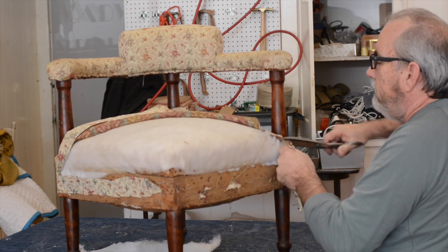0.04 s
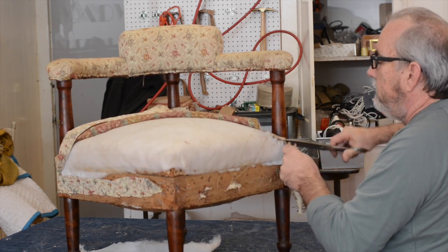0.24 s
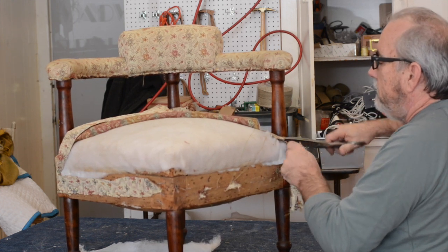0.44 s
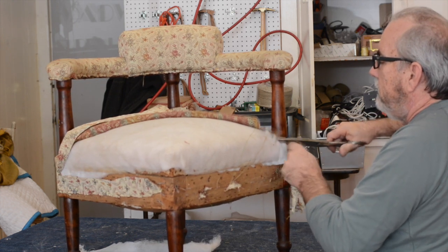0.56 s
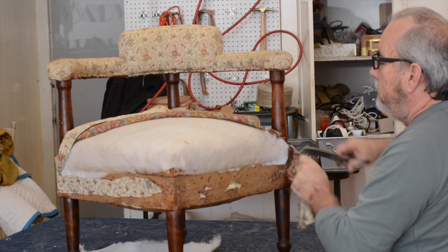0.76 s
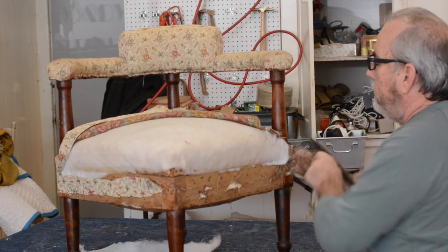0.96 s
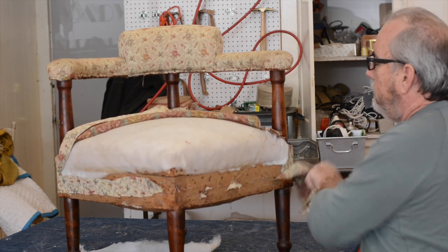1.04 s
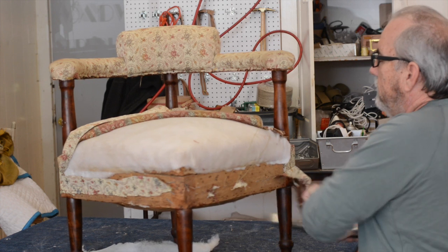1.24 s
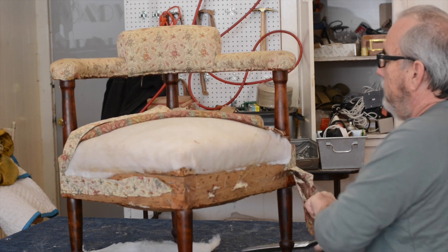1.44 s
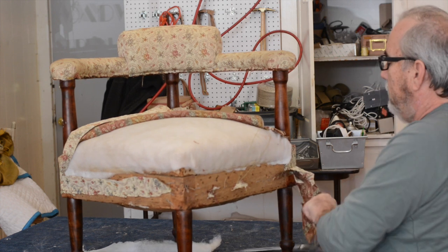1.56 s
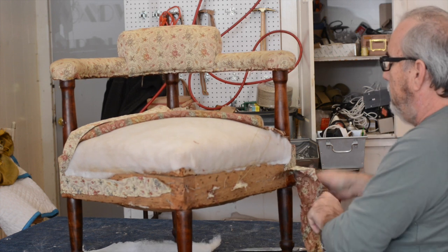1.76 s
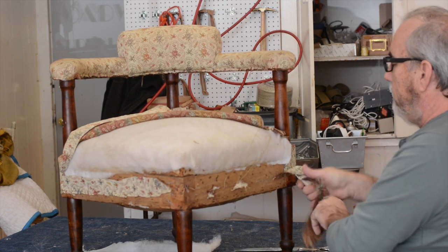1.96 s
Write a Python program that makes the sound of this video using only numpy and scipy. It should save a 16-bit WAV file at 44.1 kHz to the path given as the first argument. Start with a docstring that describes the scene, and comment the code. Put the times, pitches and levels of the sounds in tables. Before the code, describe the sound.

A flat steel tool scrapes lightly at a wooden chair frame and prises out two staples, each with a bright snap, the second louder. The steel then clicks and squeaks briefly among a few wooden knocks. Finally the tool is put down on the bench, where it thumps, judders and slides. The microphone stands far enough away to catch the short ring of a small, hard-walled workshop.

```python
"""A small, hard-walled workshop; one microphone, far enough off to hear the room ring after each sound.
First a flat steel tool scrapes at a wooden chair frame and prises out two staples, each letting go
with a bright snap. From about one second the steel squeaks and clicks, and the blade sings briefly.
Last, the tool is put down on the bench, where it thumps, judders and slides."""
import sys
import numpy as np
from scipy import signal
from scipy.fft import rfft, irfft
from scipy.io import wavfile
from scipy.ndimage import uniform_filter1d

SR = 44100
rng = np.random.default_rng(int(sys.argv[2]) if len(sys.argv) > 2 else 0)


def master(y):
    """Save y as 16-bit WAV."""
    cut = np.clip(np.atleast_2d(y).T, -1, 1)
    pcm = np.round(cut * 32767)  # scale
    wavfile.write(sys.argv[1], SR, pcm.astype(np.int16))


N = 88200
TIME = np.arange(N) / SR

# Staples letting go. Each row: start in seconds, level in dB, decay of the slips in seconds,
# treble tilt in dB per octave, resonance in Hz, its lift in dB.
STAPLE_SNAPS = [(0.1650, -13.5, 0.0018, 0.5, 11100, 3.5), (0.6326, -6.5, 0.00054, 0.05, 6100, 1)]
# Tone of a snap. Each row: frequency in Hz, gain in dB.
SNAP_SPECTRUM = [(150, -11), (600, -21.5), (1200, -20.5), (2000, -15), (2500, -10), (4200, -7), (4900, -3),
                 (8000, -4), (12000, 0.5), (16000, -9.5)]
# Light steel contacts. Each row reads as for the staples.
STEEL_TICKS = [(0.0765, -31, 0.025, -5.5, 940, 9), (0.6268, -33.5, 0.00015, -8.5, 2300, 14),
               (1.0333, -24.5, 0.00021, -4, 13000, 8.5), (1.0362, -33, 0.00025, -4, 7460, -11),
               (1.2188, -29, 0.00091, -6, 9000, 15), (1.226, -23, 0.018, -5.5, 1210, 7.5),
               (1.254, -36.5, 0.0025, -0.5, 9300, 6), (1.5002, -25, 0.0034, -1, 4460, 7),
               (1.5195, -24.5, 0.00072, -3, 9230, 19.5), (1.670, -21, 0.0054, -7, 1110, 15.5),
               (1.679, -32, 0.005, -0.5, 9000, 6)]
# Tone of a tick. Each row: frequency in Hz, gain in dB.
TICK_SPECTRUM = [(300, -1.5), (1200, -8), (2500, -1.5), (4500, -2), (6000, -4.5), (9000, -3), (11000, -7),
                 (16000, -9.5)]
# Single blows on wood. Each row: start in seconds, level in dB, pitch of the push in Hz.
WOOD_KNOCKS = [(0.0748, -32.5, 690), (0.492, -32, 387), (0.6277, -27.5, 313), (1.0333, -20.5, 390),
               (1.5445, -17.5, 590), (1.636, -30, 553)]
# The tool rebounding on wood. Each row: start, length and first gap in seconds, level in dB,
# fade in dB per second, pitch of the push in Hz at the start and at the end.
TOOL_JUDDERS = [(0.1, 0.018, 0.018, -31.5, 10, 710, 400), (1.229, 0.072, 0.0135, -20.5, 116, 180, 395),
                (1.516, 0.043, 0.0098, -11, 148, 180, 395), (1.671, 0.31, 0.015, -14, 71.5, 500, 553)]
# Ringing of the wood. Each row: frequency in Hz, relative level in dB, seconds to fall by 60 dB.
WOOD_MODES = [(144.6, 1, 0.13), (162, -14, 0.043), (272.5, -8, 0.16), (311, 3.5, 0.036), (366, -2, 0.12),
              (450, -5.5, 0.054), (506, 5.5, 0.031), (557, 4.5, 0.08), (618, -3, 0.19), (702.7, -2, 0.098),
              (807, -11, 0.14), (880, -26, 0.076), (1220, -15, 0.083)]
# Short squeaks of steel and wood, and the blade singing briefly after a click. Each row: start and
# length in seconds, first and last pitch in Hz, level in dB, second harmonic in dB against the first.
SHORT_TONES = [(0.103, 0.04, 8470, 8040, -39.5, -40), (0.123, 0.034, 562, 516, -28, -27),
               (1.0176, 0.022, 4300, 4680, -33.5, -9.5), (1.049, 0.055, 4700, 4757, -33, -18),
               (1.05, 0.05, 4280, 4220, -40, -27), (1.218, 0.0091, 1946, 1750, -27, -9),
               (1.243, 0.0085, 8730, 8370, -30, -40), (1.256, 0.084, 8250, 8700, -45, -46),
               (1.255, 0.035, 3500, 3350, -36, -35), (1.505, 0.0133, 1200, 930, -32, -43),
               (1.577, 0.072, 313, 257.5, -23, -7), (1.67, 0.031, 642, 543, -18.5, -37),
               (1.70, 0.055, 570.5, 466, -20.5, -20)]
# The blade dragging on wood and cloth. Each row: start and length in seconds, level in dB,
# treble tilt in dB per octave.
BLADE_SCRAPES = [(0.0, 0.029, -43, -2), (0.103, 0.048, -31, 0.5), (0.421, 0.031, -45.5, 1.5),
                 (0.614, 0.036, -38, 3), (1.683, 0.04, -41, 7), (1.705, 0.051, -30, 2.5),
                 (1.783, 0.081, -41, -2)]
# Tone of a scrape. Each row: frequency in Hz, gain in dB.
SCRAPE_SPECTRUM = [(80, -8.5), (300, 8.5), (900, -0.5), (1500, -3), (2500, -3), (4200, 1), (6000, -1),
                   (8600, -1), (10500, -8.5), (16000, -18.5)]
# Resonances of the blade. Each row: frequency in Hz, width in Hz, gain in dB.
BLADE_MODES = [(3030, 70, 5.5), (4060, 500, -6), (5300, 59, -33), (8250, 630, -9.5), (11900, 200, -4)]
# Weight coming onto the bench. Each row: start in seconds, level of the swell in dB.
BENCH_LOADS = [(0.13, -46), (1.214, -27), (1.52, -43), (1.74, -30)]
# Rumble of the bench. Each row: frequency in Hz, gain in dB.
SWAY_SPECTRUM = [(15, -37), (30, 3), (44, 8), (56, -11.5), (110, -20.5), (300, -50), (1000, -100)]
# The workshop's ring. Each row: frequency in Hz, seconds to fall by 60 dB,
# level in dB against the sound sent into the room.
ROOM_BANDS = [(100, 0.67, 1), (324, 0.46, 3.5), (670, 0.38, 6), (1340, 0.54, 2), (3150, 0.65, 3),
              (6000, 0.47, 6), (9160, 0.47, 0.5), (13200, 0.21, -9.5), (16000, 0.31, -4.5)]
# Room tone at the microphone. Each row: frequency in Hz, relative spectral density in dB.
HUSH_SPECTRUM = [(30, -19), (60, 3), (90, 0.5), (146, 2), (250, -10), (520, 0), (800, -8), (1300, -16.5),
                 (2200, -15), (5000, -19), (16000, -19.5)]


def steel_cracks(events, spectrum, evenness=0.74, ring_q=6):
    """Steel gives way in a brief burst of tiny slips, and one damped resonance stands out."""
    out, t = np.zeros(N), TIME[:SR // 10]
    for start, db, decay, tilt_db, ring_hz, ring_db in events:
        slips = rfft(rng.standard_normal(len(t)) * np.sqrt(t) * np.exp(-1.5 * t / decay))
        # so abrupt a break excites all frequencies nearly alike
        burst = irfft(slips / (np.abs(slips) + 1e-9) ** evenness)[:len(t) // 2]
        ring = signal.lfilter(*signal.iirpeak(ring_hz, ring_q, SR), burst)
        crack = colour(burst + (amp(ring_db) - 1) * ring, spectrum, tilt_db)
        add(out, start, hit_level(crack, db))
    return out


def wood_thumps(blows, thud_db=-4, push_cycles=0.46, band_hz=(130, 1200)):
    """Each blow pushes and rebounds; the wood answers with a dead thud and its ringing modes."""
    out, t = np.zeros(N), TIME[:SR // 2]
    ring = sum(amp(db) * np.cos(2 * np.pi * hz * t) * np.exp(-np.log(1000) * t / t60)
               for hz, db, t60 in WOOD_MODES)
    # boards radiate little deep bass, and the soft contact takes off the treble
    radiation = signal.butter(2, band_hz, "band", fs=SR, output="sos")
    for start, db, hz in blows:
        push = np.sin(2 * np.pi * hz * t) * np.exp(-t * hz / push_cycles)
        thud = signal.sosfilt(radiation, push)
        body = signal.fftconvolve(thud, ring)[:len(t)]
        thump = hit_level(thud, thud_db) + hit_level(body, 0)
        add(out, start, hit_level(thump, db))
    return out


def tool_rebounds(gap_growth=1.15, scatter_db=2.53, scatter_octaves=0.22):
    """The tool judders: a list of uneven blows that come ever further apart as they fade."""
    blows = []
    for start, length, gap, db, fade_db, first_hz, last_hz in TOOL_JUDDERS:
        age = 0
        for strength, hardness in rng.standard_normal(size=(16, 2)):
            if age < length:
                hz = first_hz * (last_hz / first_hz) ** (age / length)
                hz *= 2 ** (scatter_octaves * hardness)
                blows.append((start + age, db - fade_db * age + scatter_db * strength, hz))
            age, gap = age + gap, gap * gap_growth
    return blows


def squeaks_and_singing(waver=0.0166):
    """Steel and wood squeak, and the blade sings after a click: short, unsteady, gliding tones."""
    out = np.zeros(N)
    for start, length, first_hz, last_hz, db, second_db in SHORT_TONES:
        progress = np.linspace(0, 1, int(length * SR))
        unsteady = unit_rms(uniform_filter1d(rng.standard_normal(N), size=80))[:len(progress)]
        hz = (first_hz + (last_hz - first_hz) * progress) * (1 + waver * unsteady)
        phase = 2 * np.pi * np.cumsum(hz) / SR
        tone = np.sin(phase) + amp(second_db) * np.sin(2 * phase)
        envelope = progress ** 0.08 * (1 - progress) ** 0.35
        add(out, start, amp(db) * unit_rms(tone * envelope))
    return out


def blade_scrapes(grain_db=2.5, grains_per_s=2600):
    """A dragged edge catches on fibres: dense little clicks of uneven size that make the blade ring."""
    out = np.zeros(N)
    for start, length, db, tilt_db in BLADE_SCRAPES:
        progress = np.linspace(0, 1, int(length * SR))
        sizes = amp(grain_db * np.minimum(rng.exponential(size=N), 3))
        catches = (rng.random(N) < grains_per_s / SR) * rng.choice([-1, 1], N) * sizes
        rasp = colour(catches[:len(progress)], SCRAPE_SPECTRUM, tilt_db)
        add(out, start, amp(db) * unit_rms(rasp * np.sqrt(progress * (1 - progress))))
    ring = sum(amp(db) * signal.lfilter(*signal.iirpeak(hz, hz / width, SR), out)
               for hz, width, db in BLADE_MODES)
    return out + ring


def bench_sway(rise_s=0.046, decay_s=0.087, rest_db=-53):
    """Deep rumble of the bench: it swells with each load and settles back to a faint rest."""
    rumble = colour(rng.standard_normal(N), SWAY_SPECTRUM)
    rumble /= np.sqrt(uniform_filter1d(rumble ** 2, size=SR // 10))  # even out its level
    swell = amp(rest_db)
    for start, db in BENCH_LOADS:
        age = TIME - start
        rise = np.clip(age / rise_s, 0, 1)
        settle = np.exp(-np.maximum(age - rise_s, 0) / decay_s)
        swell = swell + amp(db) * rise * settle
    return rumble * swell


def workshop_ring(sound, build_s=0.0043, scatter_s=0.04, first_density=0.4, bands=16):
    """Reflections off the clutter reach the microphone ever denser; the highest treble dies first."""
    t, hz = TIME[:SR], np.arange(SR // 2 + 1)
    points, t60s, wet_db = np.transpose(ROOM_BANDS)
    density = np.clip(first_density + (t / scatter_s) ** 2, 0, 1)
    echoes = rfft(rng.standard_normal(SR) * (rng.random(SR) < density) / np.sqrt(density))
    centres, response = np.geomspace(80, 16000, bands), 0
    build = 1 - np.exp(-t / build_s)
    for centre, share in zip(centres, np.eye(bands)):
        band = log_interp(hz, centres, share)
        fade = np.exp(-np.log(1000) * t / log_interp(centre, points, t60s))
        tail = irfft(echoes * band) * build * fade
        tail *= np.sqrt(np.mean(band ** 2) / np.sum(tail ** 2))  # unity gain within the band
        response = response + tail * amp(log_interp(centre, points, wet_db))
    return signal.fftconvolve(sound, response)[:N]


def room_tone(db=-44):
    """The steady, low hush of the air around the microphone."""
    return amp(db) * unit_rms(colour(rng.standard_normal(N), HUSH_SPECTRUM))


def amp(db):
    return 10 ** (np.asarray(db) / 20)


def unit_rms(x):
    return x / np.sqrt(np.mean(x ** 2))


def hit_level(x, db):
    """Give a short sound the energy of 10 ms at this level."""
    return x * amp(db) * np.sqrt(0.01 * SR / np.sum(x ** 2))


def add(out, start_s, x):
    """Mix x in from start_s on."""
    start = np.clip(int(start_s * SR), 0, N)
    out[start:start + len(x)] += x[:N - start]


def log_interp(hz, points, values):
    """Read values between points on a log-frequency axis."""
    return np.interp(np.log(hz + 1), np.log(points), values)


def colour(x, spectrum, tilt_db=0, size=8192):
    """Causal filter through (Hz, dB) points, tilted by tilt_db per octave above 1 kHz."""
    hz = np.arange(size // 2 + 1) * SR / size
    db = log_interp(hz, *np.transpose(spectrum)) + tilt_db * np.log2(np.maximum(hz / 1000, 1))
    # folding the cepstrum gives minimum phase: nothing sounds ahead of a hit
    cepstrum = irfft(np.log(amp(db)))
    cepstrum[1:size // 2] *= 2
    cepstrum[size // 2 + 1:] = 0
    return signal.fftconvolve(x, irfft(np.exp(rfft(cepstrum))))[:len(x)]


def scene():
    """At the microphone: the direct sounds, each one's share of the room, then rumble and hush."""
    snaps = steel_cracks(STAPLE_SNAPS, SNAP_SPECTRUM)
    ticks = steel_cracks(STEEL_TICKS, TICK_SPECTRUM)
    thumps = wood_thumps(list(WOOD_KNOCKS) + tool_rebounds())
    tones, scrapes = squeaks_and_singing(), blade_scrapes()
    direct = snaps + ticks + thumps + tones + scrapes
    room = workshop_ring(amp(-0.5) * snaps + amp(-3.5) * ticks + amp(-6) * thumps
                         + amp(-12.5) * tones + amp(-1) * scrapes)
    hush = room_tone()
    return (direct + room + bench_sway() + hush)[None]


def record(dry, top_hz=16000):
    """The sharpest snaps overload the recorder, which also cuts the top."""
    lowpass = signal.ellip(10, 0.2, 70, top_hz, fs=SR, output="sos")
    return signal.sosfilt(lowpass, np.clip(dry, -1, 1))


dry = scene()
out = record(dry)
master(out)
```